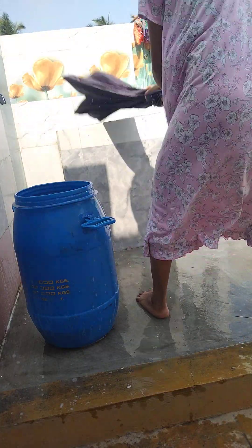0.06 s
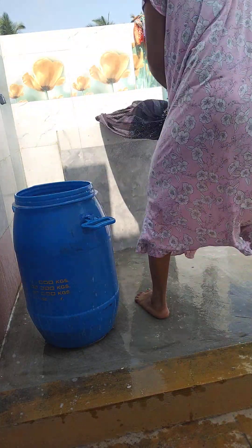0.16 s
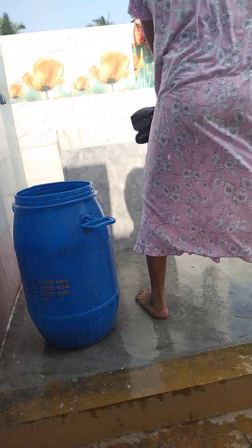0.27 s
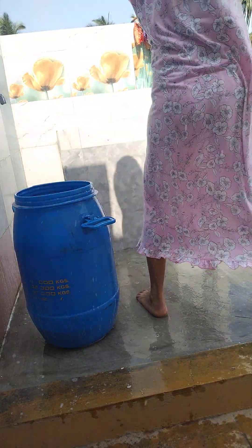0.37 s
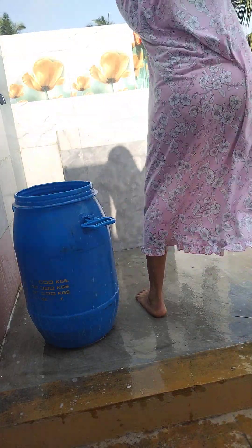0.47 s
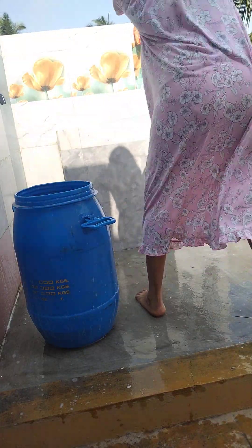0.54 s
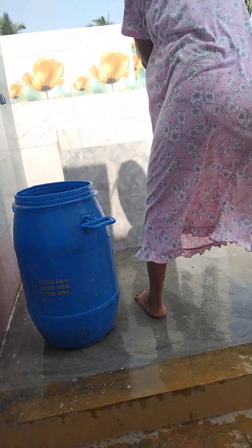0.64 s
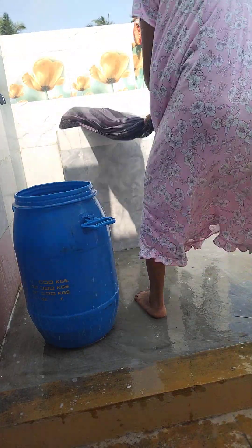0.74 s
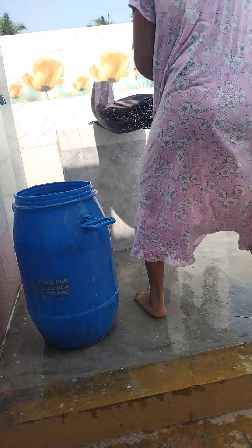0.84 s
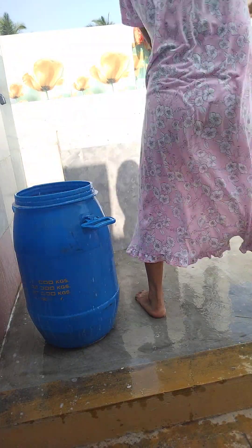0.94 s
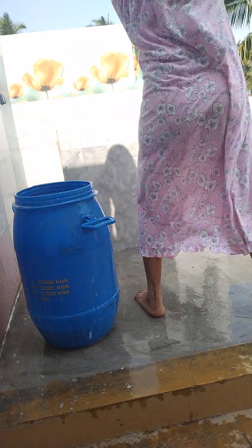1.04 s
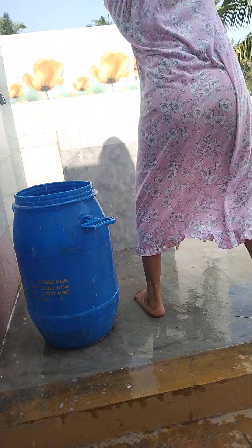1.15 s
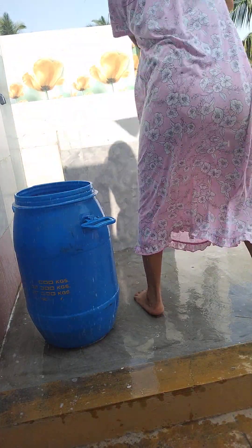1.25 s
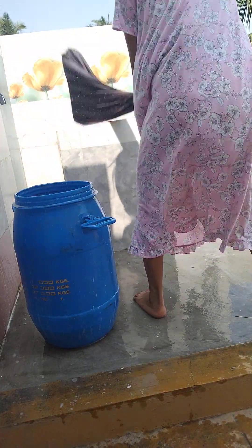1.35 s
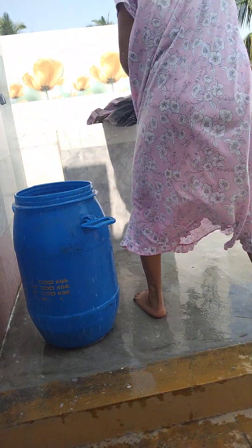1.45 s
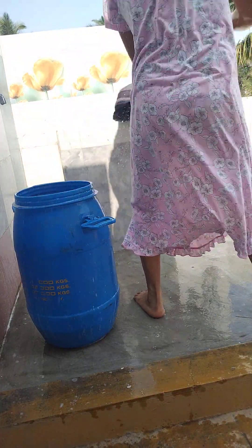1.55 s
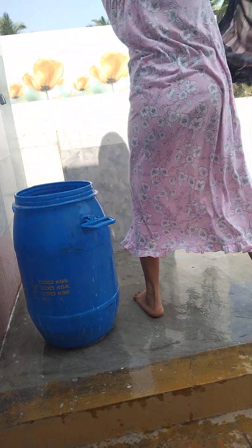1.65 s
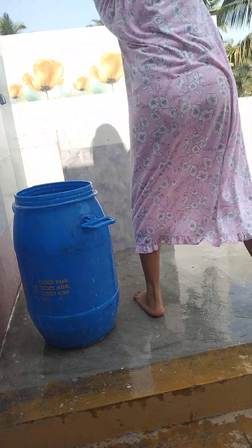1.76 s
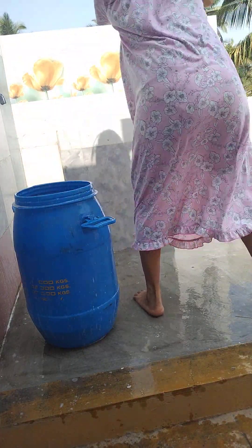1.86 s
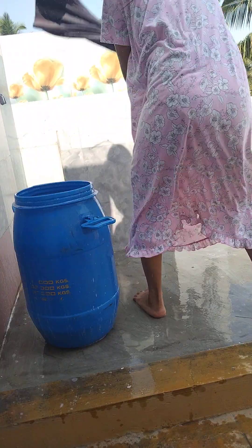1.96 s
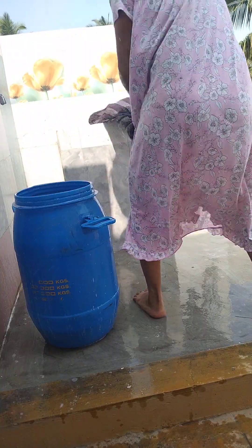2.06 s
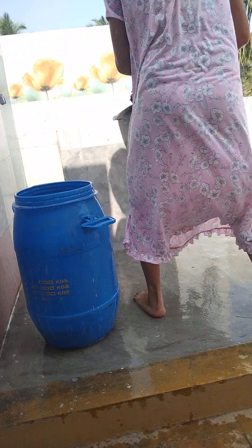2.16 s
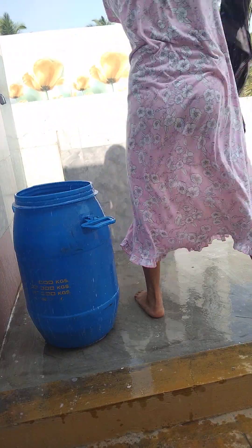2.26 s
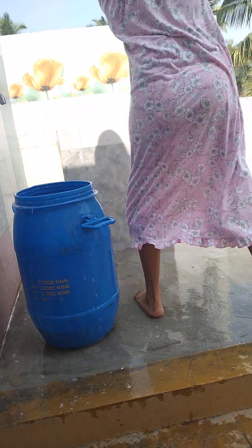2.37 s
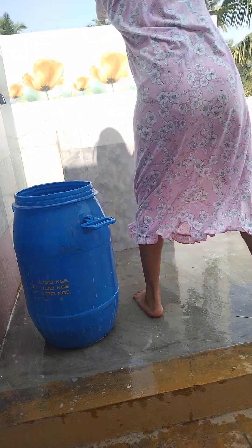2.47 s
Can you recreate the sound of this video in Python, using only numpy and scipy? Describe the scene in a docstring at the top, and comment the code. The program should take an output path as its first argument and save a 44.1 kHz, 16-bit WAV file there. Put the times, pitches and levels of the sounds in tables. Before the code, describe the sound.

Wet cloth slaps a stone slab four times close to the microphone, at about 0.2, 0.85, 1.5 and 2.1 seconds, the second a little softer. Each slap is a sharp, watery crack with a thud, echoing briefly off the yard walls. Between slaps the cloth quietly peels off the stone, flops and sheds tiny drops, peeling once more near 2.4 seconds. A faint low hum runs underneath.

```python
"""A low hum and faint noise, a soft flop, then a wet cloth slaps onto a stone slab near the microphone.
It lands four times in a walled washing yard, beside an open plastic barrel. Each slap is a crackle of
water, the thud of the cloth and the pop of air trapped under it; the barrel hums and the walls answer.
Between slaps the cloth peels off the stone, flops and sheds drops. Far off there is one faint chirp."""
import sys
import numpy as np
from scipy import signal
from scipy.fft import rfft, irfft, next_fast_len
from scipy.io import wavfile
from scipy.ndimage import uniform_filter1d, map_coordinates

SR = 44100
rng = np.random.default_rng(int(sys.argv[2]) if len(sys.argv) > 2 else 0)


def wav_out(sig):
    """Save sig, one row per channel (or a flat mono array), as 16-bit PCM at SR to the path in sys.argv[1]."""
    wavfile.write(sys.argv[1], SR, np.round(np.clip(np.atleast_2d(sig).T, -1, 1) * 32767).astype(np.int16))


N = 110250
T, SCENE_T = np.arange(SR) / SR, np.arange(N) / SR  # seconds: through one event, through the scene


def amp(db):
    """Decibels to gain."""
    return 10 ** (np.asarray(db) / 20)

def unit(x):
    """Scale to rms 1."""
    return x / np.sqrt(np.mean(x ** 2) + 1e-20)

def along(points, hz):
    """Read a curve of (Hz, value) points on a log frequency axis."""
    freqs, values = np.transpose(points)
    return np.interp(np.log(hz + 1), np.log(freqs + 1), values)

def colour(x, spectrum):
    """Filter x by a spectrum of (Hz, relative dB) points and scale to rms 1."""
    gain = amp(along(spectrum, np.fft.rfftfreq(len(x), 1 / SR)))
    return unit(irfft(rfft(x) * gain, len(x)))

def noise(spectrum, spiky=0):
    """A second of coloured noise; spiky breaks it into tiny clicks."""
    return colour(rng.standard_normal(SR) * np.exp(spiky * rng.standard_normal(SR)), spectrum)

def swell(rise, hold, t60):
    """Linear rise, hold, then a fall of 60 dB per t60; all in seconds."""
    return np.minimum(T / rise, 1) * amp(-60 * np.maximum(T - rise - hold, 0) / t60)

def wobble(rate, n=SR):
    """A smooth random curve of n samples, rate knots a second."""
    return map_coordinates(rng.standard_normal(1000), [np.arange(n) * rate / SR], mode="wrap")

def ringing(hz, jitter=0.56, rate=110):
    """A second of tone with an unsteady phase."""
    return np.sin(2 * np.pi * hz * T + jitter * wobble(rate))

def add(out, start, x):
    """Mix x into out from start, in seconds."""
    k = round(start * SR)
    out[k:k + len(x)] += x[:N - k]


# The hum behind everything in the yard. Each row: pitch in Hz, level in dB.
HUM_TONES = [(122, -59), (146, -57.5), (166, -62)]

def hum():
    """Low tones, each wavering in level and phase."""
    out = np.zeros(N)
    for hz, db in HUM_TONES:
        waver = 1 + 0.5 * wobble(8.8, N)
        out += amp(db) * unit(waver * np.sin(2 * np.pi * hz * SCENE_T + 0.56 * wobble(21, N)))
    return out

# Three bands of background noise at the microphone. Each row: frequency in Hz, relative level in dB.
RUMBLE_SPECTRUM = [(25, -41), (55, -24.5), (80, -9.5), (130, 1.5), (180, -3), (260, -23), (600, -40),
                   (2000, -54.5)]
MIDRANGE_SPECTRUM = [(120, -24.5), (250, -3), (480, 4.5), (600, -4), (800, -9), (1350, -3.5), (2100, -18.5),
                     (3000, -17.5), (5000, -24), (7800, -26.5), (10500, -37), (15500, -39)]
HISS_SPECTRUM = [(500, -12), (1300, 8.5), (2200, -1.5), (3200, -4), (4100, 8.5), (5500, -1), (7800, 6.5),
                 (10500, -5), (15500, 3.5)]
# The level of the middle band, lowest just before the second slap. Each row: time in seconds, level in dB.
MIDRANGE_LEVELS = [(0, -58.5), (.1, -71), (.4, -60.5), (.56, -60), (.68, -84.5), (.8, -83.5), (1.1, -55.5),
                   (1.33, -59.5), (1.8, -54), (2.05, -52), (2.5, -48.5)]

def background_noise():
    """Steady rumble and hiss; the midrange briefly drops out, as if muted by a noise suppressor."""
    midrange_db = np.interp(SCENE_T, *np.transpose(MIDRANGE_LEVELS))
    layers = [(-58, RUMBLE_SPECTRUM), (midrange_db, MIDRANGE_SPECTRUM), (-71.5, HISS_SPECTRUM)]
    return sum(amp(db) * colour(rng.standard_normal(N), spectrum) for db, spectrum in layers)

def patter(per_second=14):
    """Faint drips around the yard, each a tick of noise of random time and size."""
    spectrum = [(500, 2), (1500, -3.5), (8000, 2), (15000, 0.5)]
    out = np.zeros(N)
    for when, size in rng.random((int(per_second * N / SR), 2)):
        add(out, when * SCENE_T[-1], amp(-63.5) * size * noise(spectrum) * swell(0.001, 0.001, 0.04))
    return out

# The cloth swung over the slab. Each row: start in seconds, level in dB, pitch in Hz, t60 in seconds.
CLOTH_FLOPS = [(.141, -45, 483, 0.25), (0.689, -51.5, 409, 0.29), (0.812, -44, 543, 0.19),
               (1.167, -49.5, 980, .06), (1.257, -47.5, 662, 0.095), (1.407, -46.5, 490, 0.072),
               (1.843, -41, 475, 0.086), (2.0206, -34.5, 425, 0.08), (2.053, -46, 458, 0.38),
               (2.394, -39, 314, 0.048)]
# The colour of a flop. Each row: multiple of the pitch, relative level in dB.
FLOP_SPECTRUM = [(.25, -3), (.65, -7), (1, 9.5), (1.5, -12), (2.7, -25), (5, -44.5), (16, -53)]

def flops():
    """The swung cloth flops softly, with a little pop of air each time."""
    out = np.zeros(N)
    for start, db, hz, t60 in CLOTH_FLOPS:
        cloth = noise([(ratio * hz, level) for ratio, level in FLOP_SPECTRUM])
        pop = amp(-6) * ringing(hz)
        add(out, start, amp(db) * (cloth + pop) * swell(0.002, 0.0035, t60))
    return out

# Peeling at the slab. Each row: start in seconds, level in dB, rise and t60 in seconds.
CLOTH_PEELS = [(0.141, -51.5, 0.0063, 0.35), (.495, -52.5, 0.011, 0.25), (1.163, -53.5, 0.0039, 0.21),
               (1.403, -55.5, 0.0039, .15), (1.796, -49.5, 0.006, 0.46), (2.375, -39, 0.017, 0.17),
               (2.419, -52, .02, 0.49)]
# Wet cloth against stone. Each row: frequency in Hz, relative level in dB.
WET_CLOTH_SPECTRUM = [(200, -5), (700, -1.5), (1500, -1), (2500, -6.5), (5000, -17.5), (8000, -17),
                      (10500, -29), (15000, -25)]

def peels():
    """The cloth peels off the stone and sprays in grainy bursts."""
    out = np.zeros(N)
    for start, db, rise, t60 in CLOTH_PEELS:
        add(out, start, amp(db) * noise(WET_CLOTH_SPECTRUM, spiky=0.78) * swell(rise, 0.0056, t60))
    return out

# The slaps, close by. Each row: start in seconds, water level in dB, crackle hold in seconds, thud level
# in dB, thud rise in seconds, bass and yard levels in dB, yard tilt in dB per octave, barrel level in dB,
# the tip's lead in seconds, tip level in dB.
SLAB_SLAPS = [(0.2048, -17, 0.0071, -16.5, 0.0093, -18, -20, -1, -37, 0.0047, -42.5),
              (0.85, -27, 0.005, -21, 0.0029, -35, -20, -0.26, -32, .0045, -35.5),
              (1.4784, -14.5, 0.0025, -16.5, 0.01, -19.5, -23.5, -0.6, -25, 0.0016, -29),
              (2.1189, -25.5, 0.016, -16, 0.0068, -30.5, -19, -0.48, -26, .003, -32)]

def slaps():
    """The tip lands first, the cloth's weight follows, and the barrel and the walls answer."""
    direct, around = np.zeros(N), np.zeros(N)  # only direct goes on to the near walls
    for (start, water_db, hold, thud_db, rise, bass_db,
         yard_db, tilt_db, barrel_db, lead, tip_db) in SLAB_SLAPS:
        tip = amp(tip_db) * noise(WET_CLOTH_SPECTRUM) * swell(0.00052, 0.0013, 0.005)
        crackle, spray = water(water_db, hold)
        thud, bass = cloth_weight(thud_db, rise, bass_db)
        add(direct, start - lead, tip)
        add(direct, start, crackle + thud)
        add(around, start, spray + bass + amp(barrel_db) * barrel() + amp(yard_db) * yard(tilt_db))
    direct += snaps()
    return direct + around + air_pockets() + near_walls(direct)

# Water struck on the slab. Each row: frequency in Hz, relative level in dB.
WATER_SPECTRUM = [(300, 3), (1000, 5), (2300, 8), (4500, -11.5), (6000, -8), (8000, -0.5), (10500, -13),
                  (15500, -10.5)]

def water(db, hold):
    """Water crackles under the cloth, then scatters as a softer, longer spray."""
    crackle = amp(db - 1) * noise(WATER_SPECTRUM, spiky=1.13) * swell(0.00045, hold, 0.024)
    spray = amp(db - 20.5) * noise(WATER_SPECTRUM, spiky=0.64) * swell(0.0066, 0.011, 0.47)
    return crackle, spray

# The body of a slap and its low end. Each row: frequency in Hz, relative level in dB.
THUD_SPECTRUM = [(100, -40), (220, -1.5), (500, 5.5), (850, 7.5), (1100, -1.5), (2200, -9), (3400, -16.5),
                 (5000, -18.5), (8000, -49.5), (15000, -29)]
BASS_SPECTRUM = [(25, -35.5), (50, -32), (75, -27.5), (120, 10.5), (200, -8.5), (400, -5.5), (1000, -66)]

def cloth_weight(thud_db, rise, bass_db):
    """The weight of the cloth meets the stone: a thud with a longer bass under it."""
    thud = amp(thud_db) * noise(THUD_SPECTRUM) * swell(rise, 0.0028, 0.14)
    bass = amp(bass_db) * noise(BASS_SPECTRUM) * swell(0.0069, 0.032, 0.16)
    return thud, bass

# The open barrel beside the slab. Each row: pitch in Hz, relative level in dB, t60 in seconds.
BARREL_MODES = [(166.7, 0.5, 0.35), (228, -12.5, 0.27), (348.4, -11.5, 0.3)]

def barrel():
    """The barrel's air builds up, then rings out; stronger modes hold longer."""
    return sum(amp(db) * swell(0.017, 0.089 * amp(db), t60) * ringing(hz, jitter=0.07, rate=17)
               for hz, db, t60 in BARREL_MODES)

# The yard's echo, heard from inside its walls. Each row: frequency in Hz, relative level in dB.
YARD_SPECTRUM = [(35, -37), (70, -11.5), (110, -7), (190, -11.5), (235, 1.5), (280, -11), (340, 2),
                 (420, -4.5), (530, -2), (750, -6.5), (1000, -8), (1350, -5.5), (1800, -11), (2500, -15),
                 (3400, -22.5), (5000, -31), (6300, -32), (7800, -31), (10000, -47.5), (15500, -49.5)]
# How long the yard rings. Each row: frequency in Hz, t60 in seconds.
YARD_DECAY = [(100, 0.72), (400, 0.53), (1500, 0.44), (4000, 0.49), (8000, 0.58), (15000, 0.97)]
FAR_WALL_DELAY_S, FAR_WALL_DB = 0.088, -11.5

def yard(tilt_db):
    """The walls answer a slap: uneven, fluttering resonances and a second wave from the far wall."""
    spectrum = [(hz, db + tilt_db * np.log2(hz / 500)) for hz, db in YARD_SPECTRUM]
    hz, t, bands = signal.stft(noise(spectrum, spiky=0.59), SR, nperseg=1024)
    ring_db = 3 * unit(uniform_filter1d(rng.standard_normal(bands.shape), size=9, axis=1))
    bands *= amp(ring_db * (hz[:, None] > 600))  # upper bands swell and sink at random
    wash = unit(signal.istft(bands, SR, nperseg=1024)[1][:SR])
    hz, t, bands = signal.stft(wash, SR, nperseg=256)
    t60 = along(YARD_DECAY, hz)[:, None]
    near = amp(-60 * t / t60)
    far = amp(FAR_WALL_DB - 60 * abs(t - FAR_WALL_DELAY_S) / t60) * (t > FAR_WALL_DELAY_S)
    tail = signal.istft(bands * np.hypot(near, far), SR, nperseg=256)[1][:SR]
    flutter = amp(1.26 * wobble(130))
    return tail * np.minimum(T / 0.02, 1) * flutter

# Air between cloth and slab, one list per slap. Each row: pitch in Hz, level in dB, t60 in seconds.
TRAPPED_AIR = [
    [(120.3, -17.5, 0.43), (248, -11.5, 0.1), (484.4, -12, 0.13), (540, -8.5, 0.13), (821, -16.5, 0.039),
     (1350, -14, 0.046), (2042, -23.5, 0.063)],
    [(239.6, -18, 0.15), (624, -16, 0.1), (803, -17, 0.084), (1260, -18, 0.048), (2035, -23.5, 0.072)],
    [(115.3, -23, 0.15), (269.5, -22.5, 0.11), (423, -16.5, 0.032), (834, -17, 0.12)],
    [(153, -23, 0.057), (307, -16.5, 0.072), (461, -10.5, 0.068), (821, -15, 0.098), (1330, -19.5, .06)],
]

def air_pockets(delay_s=0.003487, rise_cycles=2.56):
    """Trapped air bursts just after the cloth lands, in pitched pops with a faint echo."""
    out = np.zeros(N)
    echo = amp(-21) * swell(0.025, 0, 0.49)
    for (start, *_), pockets in zip(SLAB_SLAPS, TRAPPED_AIR):
        for hz, db, t60 in pockets:
            envelope = swell(rise_cycles / hz, 0, t60) + echo
            add(out, start + delay_s, amp(db) * envelope * ringing(hz))
    return out

# The walls nearest the microphone. Each row: delay in seconds, gain in dB.
WALL_ECHOES = [(0.0113, -18), (.0225, -19.5), (.042, -18)]

def near_walls(direct):
    """Each near wall returns one quieter copy of the slap."""
    out = np.zeros(N)
    for delay, db in WALL_ECHOES:
        add(out, delay, amp(db) * direct)
    return out

# The sharp edge of each slap, straight from the slab. Each row: start in seconds, level in dB.
WET_SNAPS = [(0.2117, -3), (0.8561, -7), (1.486, -16), (2.1259, -10)]
# The noise in a snap. Each row: frequency in Hz, relative level in dB.
SNAP_SPECTRUM = [(500, -16), (1200, -3.5), (2100, 4), (3400, -0.5), (4300, -22.5), (12000, -30.5)]

def snaps(pulse_s=0.00026):
    """The cloth slams flat: one pressure pulse and a short, bright burst of noise."""
    out = np.zeros(N)
    age = T / pulse_s
    pulse = np.minimum(6 * age, 1) * (1 - age / 2) * np.exp(-age / 2)
    for start, db in WET_SNAPS:
        burst = amp(-14) * noise(SNAP_SPECTRUM) * swell(0.00033, 0.0012, 0.02)
        add(out, start, amp(db) * (pulse + burst))
    return out

# Drops on the yard floor. Each row: start in seconds, level in dB, pitch in Hz.
FLOOR_DROPS = [(.466, -55, 8560), (0.655, -62, 8200), (1.967, -58, 6960), (1.989, -48.5, 6670)]
# The colour of a drop. Each row: multiple of the pitch, relative level in dB.
DROP_SPECTRUM = [(.2, -30), (.7, -9), (.92, 8), (1.1, 3), (1.35, -23), (2.3, -16)]

def drops():
    """Drops shed by the cloth hit the floor as tiny, high ticks."""
    out = np.zeros(N)
    for start, db, hz in FLOOR_DROPS:
        tick = noise([(ratio * hz, level) for ratio, level in DROP_SPECTRUM], spiky=0.6)
        add(out, start, amp(db) * tick * swell(0.0018, 0.0015, 0.027))
    return out

# A chirp far from the microphone. Each row: time in seconds, pitch in Hz, level in dB.
CHIRP_PATH = [(1.39, 7260, -83), (1.409, 6940, -72), (1.44, 6450, -73), (1.47, 6600, -66)]

def far_chirp():
    """One thin tone slides down and lifts a little at its end."""
    times, hz, db = np.transpose(CHIRP_PATH)
    envelope = amp(np.interp(SCENE_T, times, db)) * (SCENE_T > times[0]) * (SCENE_T < times[-1])
    return envelope * np.sin(2 * np.pi * np.cumsum(np.interp(SCENE_T, times, hz)) / SR)

def scene():
    """The whole washing yard, in mono from one spot near the slab."""
    bed = hum() + background_noise() + patter()
    return (bed + flops() + peels() + slaps() + drops() + far_chirp())[None]

LOW_CUT_HZ, PEAK_CEILING, TOP_HZ = 55, 0.76, 15750

def record(dry):
    """The microphone drops the deepest bass, rounds off peaks and keeps nothing above its band limit."""
    x = signal.sosfilt(signal.butter(2, LOW_CUT_HZ, "high", fs=SR, output="sos"), dry)
    x = x / (1 + abs(x / PEAK_CEILING) ** 8) ** (1 / 8)
    padded = next_fast_len(N + SR // 2)
    in_band = np.fft.rfftfreq(padded, 1 / SR) < TOP_HZ
    return irfft(rfft(x, padded) * in_band, padded)[..., :N]


dry = scene()
out = record(dry)
wav_out(out)
```